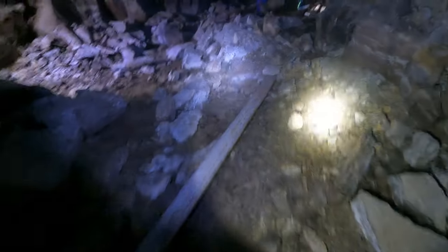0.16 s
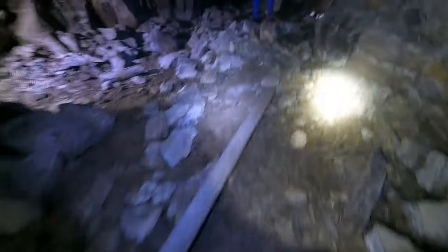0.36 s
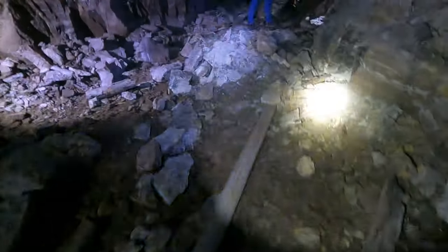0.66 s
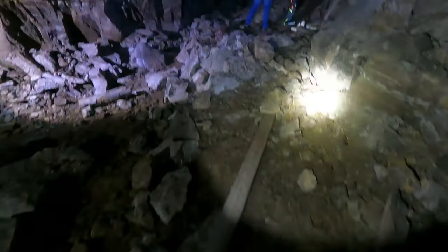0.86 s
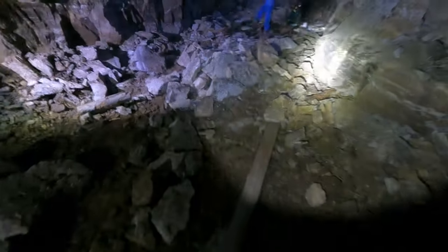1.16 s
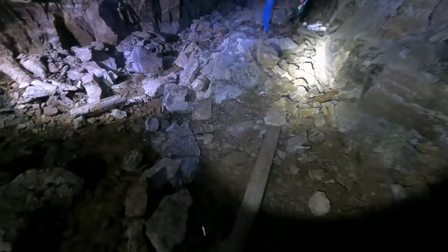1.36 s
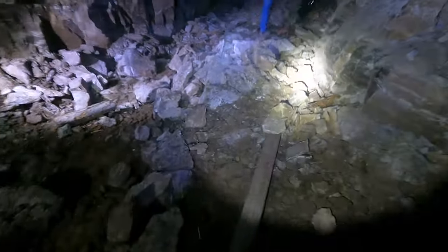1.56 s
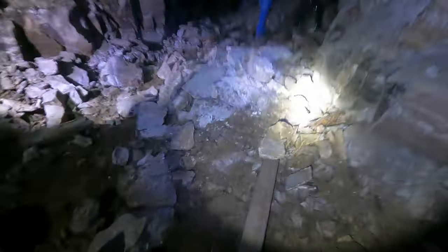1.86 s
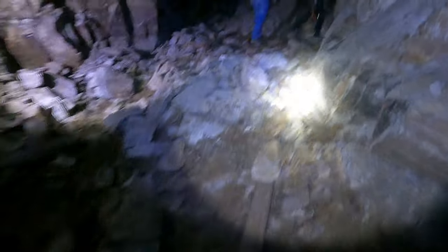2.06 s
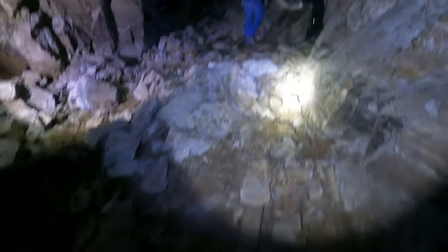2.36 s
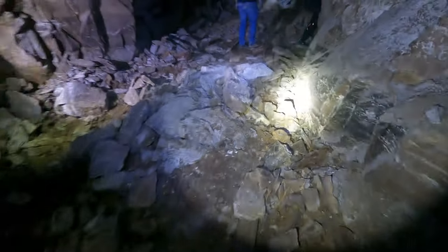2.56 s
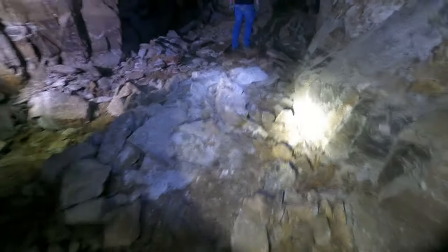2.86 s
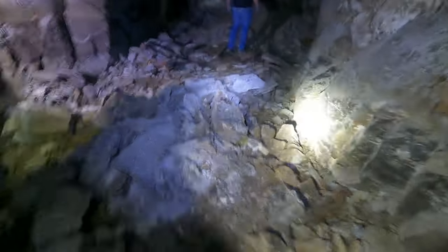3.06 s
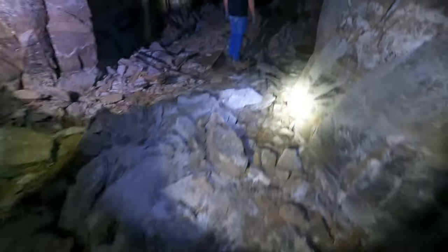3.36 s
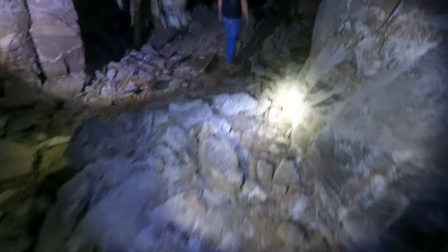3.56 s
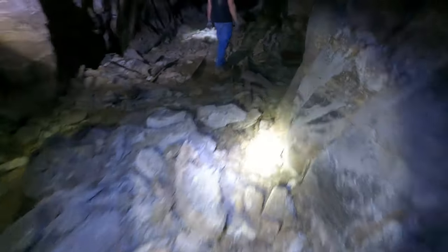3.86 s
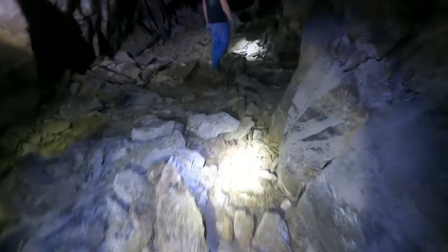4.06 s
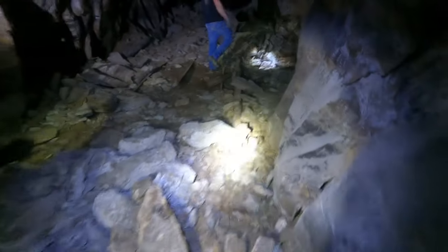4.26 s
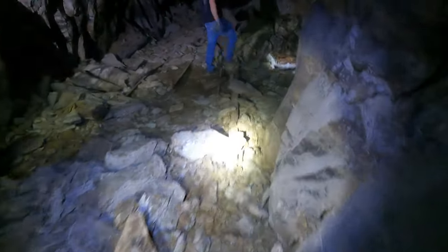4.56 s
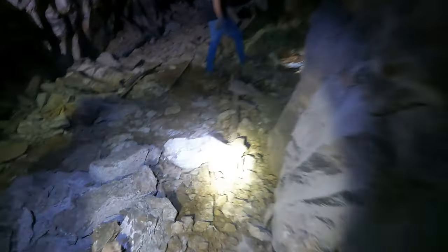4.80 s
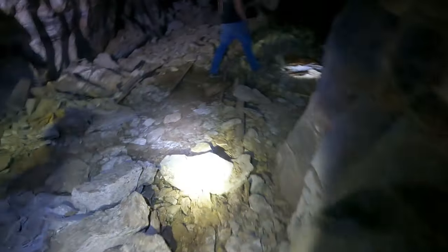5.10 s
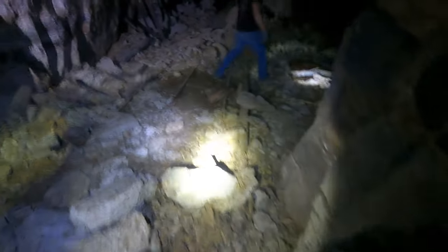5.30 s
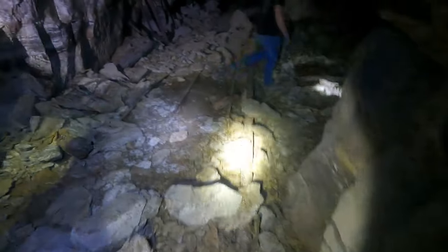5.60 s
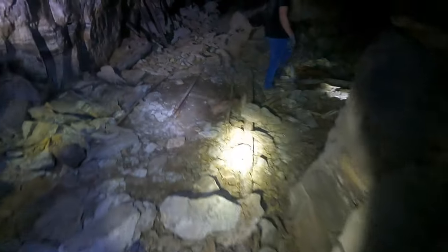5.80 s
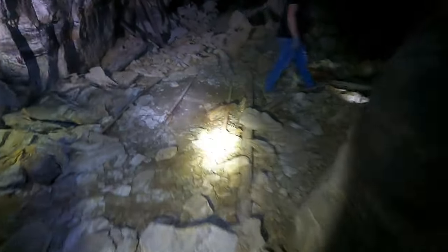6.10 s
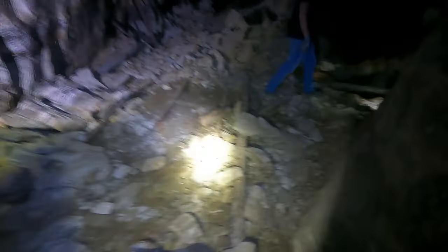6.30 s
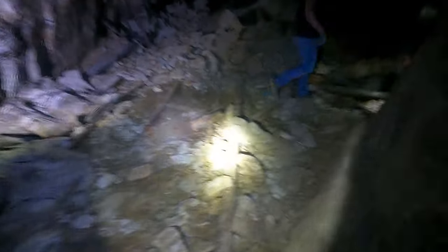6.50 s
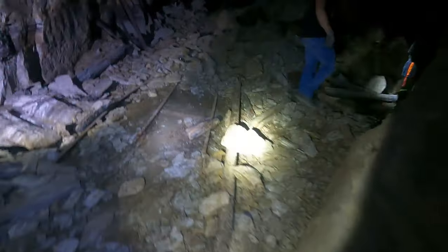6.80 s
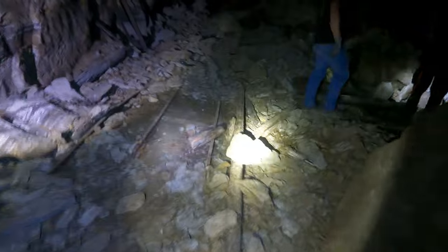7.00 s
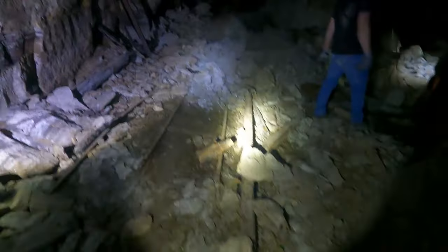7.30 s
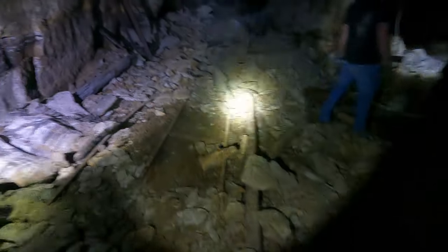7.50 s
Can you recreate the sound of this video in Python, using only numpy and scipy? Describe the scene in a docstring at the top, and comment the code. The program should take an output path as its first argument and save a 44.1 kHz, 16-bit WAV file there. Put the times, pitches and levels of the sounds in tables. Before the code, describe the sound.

Close, uneven footsteps crunch across broken stone in a mine passage, with dull thuds, sharp rock knocks and scuffed gravel over faint hiss.

```python
"""Boots on tunnel rubble

Boots tread over loose rock in a rough underground tunnel. Heels thud and stones clack and grind: noisy
contact forces drive damped modes. Slabs, gravel and grit crunch as showers of small ringing slips.
Each step also jolts the carried microphone, as low rumble. The tunnel answers with a short dull tail
of decaying noise, over a steady filtered hiss with two resonances."""
import sys
import numpy as np
from scipy import signal
from scipy.fft import rfft, irfft, next_fast_len
from scipy.io import wavfile

SR = 44100
rng = np.random.default_rng(int(sys.argv[2]) if len(sys.argv) > 2 else 0)


def convert_level_to_amplitude(level_db):
    """Map a level in decibels to its linear amplitude factor."""
    exponent = np.asarray(level_db, float) / 20
    return 10 ** exponent


def master_out(mix):
    """Clip the mix to full scale and print it as 16-bit PCM to the path in sys.argv[1]."""
    frames = np.transpose(np.atleast_2d(mix))
    ceiling = np.clip(frames, -1, 1)
    pcm = np.round(ceiling * 32767).astype(np.int16)
    wavfile.write(sys.argv[1], SR, pcm)


N = 337320
OPPOSITE = np.array([[1], [-1]])   # left and right in opposite sense


def rms_one(x):
    """Normalisation to unit root-mean-square."""
    return x / np.sqrt(np.mean(x ** 2) + 1e-20)


def at_hz(points, hz):
    """Interpolation of a curve along logarithmic frequency."""
    points = np.array(points)
    return np.interp(np.log(hz), np.log(points[:, 0]), points[:, 1])


def grid():
    """Zero padding: size and frequencies of a transform at least a second longer than the scene."""
    size = next_fast_len(N + SR)
    return size, np.maximum(np.arange(size // 2 + 1) * SR / size, 1)


def colour(x, spectrum_db):
    """Linear filtering: multiplication by a smooth response in the frequency domain."""
    size, hz = grid()
    return irfft(rfft(x, size) * convert_level_to_amplitude(spectrum_db(hz)), size)[..., :N]


def drift(rate_hz):
    """Low-passed random fluctuation of unit rms, from two equal real poles."""
    # computed at every 40th sample, with a run-in of 2000 values
    pole = np.exp(-80 * np.pi * rate_hz / SR)
    noise = rng.standard_normal(N // 40 + 2002)
    slow = signal.lfilter([1], [1, -2 * pole, pole * pole], noise)[2000:]
    return np.interp(np.arange(N) / 40, np.arange(len(slow)), rms_one(slow))


def ring(clicks, hz, t60):
    """Damped resonance: a unit click excites a decaying sine of initial height 1."""
    radius, angle = convert_level_to_amplitude(-60 / (t60 * SR)), 2 * np.pi * hz / SR
    poles = [1, -2 * radius * np.cos(angle), radius * radius]
    return signal.lfilter([0, np.sin(angle)], poles, clicks + 1e-18)


def contact(t60, rise_s):
    """Contact force: quadratic growth as the weight comes on, then exponential decay, within 0.25 s."""
    t = np.arange(SR // 4) / SR
    build_up = np.minimum(t / max(rise_s, 1e-4), 1) ** 2
    return build_up * convert_level_to_amplitude(-60 * np.maximum(t - rise_s, 0) / max(t60, .003))


def add(out, s, sound):
    """Superposition: a sound joins the sum at its onset time."""
    i = round(s * SR)
    out[..., i:i + sound.shape[-1]] += sound[..., :N - i]


# relative spectral density of the hiss: (frequency [Hz], level [dB per Hz])
HISS_SPECTRUM = [(59, -45), (100, -6.5), (359, 9), (653, -14), (726, -38), (861, -9), (1260, 0.5),
                 (1380, 0.5), (1740, 2.5), (2020, -3.5), (2670, -7.5), (7260, -10.5), (8790, -21.5),
                 (13800, -29.5), (16300, -46)]
# likeness of left and right hiss: (frequency [Hz], correlation [0 to 1])
HISS_CORRELATION = [(60, 0.58), (180, 0.52), (550, 0.34), (1650, 0.14), (4970, 0.86), (15000, 0.078)]


def hiss():
    """Partial coherence: shared and opposed noise mix so that likeness varies with frequency."""
    size, hz = grid()
    alike = at_hz(HISS_CORRELATION, hz)
    mid, side = rfft(rng.standard_normal((2, size))) * convert_level_to_amplitude(at_hz(HISS_SPECTRUM, hz))
    pair = np.sqrt(1 + alike) * mid + np.sqrt(1 - alike) * side * OPPOSITE
    level_db = -39.5 + 1.0 * drift(0.88)
    return convert_level_to_amplitude(level_db) * rms_one(irfft(pair, size)[:, :N])


# rubble stirring between the steps:
# (time [s], jolt rumble level [dB], shifting stones reference level [dB], scuffed grit level [dB])
STIRRING = [(0, -54, -45, -48), (1.0, -62, -45, -48), (1.6, -60, -53.5, -44.5), (2.0, -54, -39, -44.5),
            (3.0, -44, -45.5, -34.5), (3.7, -53, -46.5, -45), (4.2, -42.5, -36, -39),
            (5.0, -60, -41.5, -42), (5.7, -49, -41.5, -45), (6.3, -42, -34.5, -37.5), (6.88, -52, -50, -46),
            (7.12, -39, -35, -38.5), (7.65, -33, -37.5, -37.5)]
# weight comes onto the rubble: (time of full load [s], jolt rumble level [dB],
# shifting stones reference level [dB], scuffed grit level [dB],
# time to settle by 20 dB [s]; entries below 0.02 act as 0.02)
FOOTFALLS = [(0.02, -33, -40.5, -45, 0.16), (0.39, -48, -34.5, -43, 0.2), (0.448, -26, -27, -31.5, 0.18),
             (0.68, -30, -30, -36.5, 0.23), (0.78, -31, -32.5, -50, 0.04),
             (0.942, -27.5, -27.5, -22.5, 0.13), (1.33, -28, -30, -48, 0), (1.43, -50, -36.5, -37.5, .12),
             (1.75, -33.5, -34, -36, 0.5), (1.848, -27.5, -27.5, -38, 0.21), (2.22, -30, -34, -42, 0.2),
             (2.3, -30.5, -36, -35, 0.45), (2.4, -45, -40, -31.5, .15), (2.528, -29, -20, -27, -0.39),
             (2.13, -37, -33, -38, 0.25), (2.73, -38.5, -35, -51, 1.4), (2.93, -22.5, -28, -30.5, 0.07),
             (3.0, -30, -27, -29, -0.03), (3.07, -30, -30, -21, -0.06), (3.281, -24, -25.5, -45, 0.24),
             (3.42, -30, -37, -51, -0.23), (3.52, -27, -29, -46.5, -0.15), (3.62, -37.5, -48, -40, 0.2),
             (3.77, -38, -28.5, -36, 0.37), (3.85, -32, -32.5, -36.5, 0.46), (4.03, -28, -25, -40, 0.09),
             (4.45, -52.5, -42, -43.5, 0), (4.69, -19, -40.5, -36, 0.28), (4.81, -32.5, -27, -39, 0.56),
             (5.07, -35, -30.5, -38.5, 0.5), (5.32, -33.5, -41.5, -38, 0.9), (5.6, -29, -64, -39.5, -0.7),
             (5.8, -28, -31.5, -34, 0.2), (6.0, -29, -35, -38, -0.6), (6.1, -22, -26.5, -38, 0.18),
             (6.17, -26, -42, -33, 0.15), (6.28, -19.5, -33, -34, 0.36), (6.34, -37, -50, -49, 0.6),
             (6.439, -20, -22, -35.5, 0.13), (6.618, -23, -30, -31, 0.12), (6.729, -20.5, -30, -45, -0.08),
             (6.95, -26.5, -29, -33, .12), (7.27, -17.5, -27, -29, .12), (7.36, -26, -40, -53, 0.5),
             (7.449, -13.5, -22, -26, 0.1), (7.56, -22.5, -44, -45, -0.2)]


def tread():
    """Addition of powers: each step swells and settles above the stirring; jolt, stone and grit levels."""
    loading_s = 0.046   # the load swells by 20 dB in this time
    t = np.arange(0, N + 40, 40) / SR
    stir_s, *stir_levels = np.transpose(STIRRING)
    power = np.array([convert_level_to_amplitude(2 * np.interp(t, stir_s, db)) for db in stir_levels])
    for s, *levels_db, settle_s in FOOTFALLS:
        shape_db = -20 * np.maximum((s - t) / loading_s, (t - s) / max(settle_s, .02))
        power += convert_level_to_amplitude(2 * (np.c_[levels_db] + shape_db))
    return [np.interp(np.arange(N) / SR, t, 10 * np.log10(p)) for p in power]


# relative spectral density of the housing rumble: (frequency [Hz], level [dB per Hz])
JOLT_SPECTRUM = [(12, -40), (20, -5), (64, 6.5), (120, -1), (160, -5), (260, -120)]


def jolts(level_db):
    """Structure-borne excitation: steps shake the microphone housing, nearly alike on both sides."""
    mid, side = colour(rng.standard_normal((2, N)), lambda hz: at_hz(JOLT_SPECTRUM, hz))
    rumble = mid + convert_level_to_amplitude(-25) * side * OPPOSITE
    return convert_level_to_amplitude(level_db + 0.5 * drift(17)) * rms_one(rumble)


# weighting of the fragments by pitch, before a factor of frequency: (frequency [Hz], level [dB per Hz])
RUBBLE_SPECTRUM = [(71, -31), (120, 1), (378, -2.5), (445, -8.5), (643, -8), (911, 0), (988, -2),
                   (1320, -5.5), (7660, -21), (9020, -23.5), (12800, -25), (16000, -53)]


def crunch(level_db, low_hz, high_hz, median_per_s, cycles, spread_db, clump_db):
    """Clustered random impulses: fragments slip in clumps, each ringing briefly from its own side."""
    sizes = convert_level_to_amplitude(spread_db * np.minimum(rng.exponential(1, N), 5)) * rng.choice([-1, 1], N)
    born = rng.random(N) < median_per_s * convert_level_to_amplitude(clump_db * drift(25)) / SR
    side = convert_level_to_amplitude(rng.normal(0, 4.73, N))
    clicks = sizes * born * np.array([side, 1 / side])
    dealt = rng.integers(0, 16, N)   # which of 16 pitches a fragment has
    rings = 0
    for k, hz in enumerate(np.geomspace(low_hz, high_hz, 16)):
        weight = convert_level_to_amplitude(at_hz(RUBBLE_SPECTRUM, hz)) * hz
        rings = rings + weight * ring(clicks * (dealt == k), hz, t60=cycles / hz)
    return convert_level_to_amplitude(level_db) * rms_one(rings)


def slabs(stones_db):
    """Low resonance of sparse slips: large stones shift, averaged to the centre."""
    return crunch(stones_db + 3, 133.0, 563, median_per_s=400, cycles=4.86,
                  spread_db=3.0, clump_db=3.5).mean(axis=0)


def gravel(stones_db):
    """Middle resonance of denser, strongly clustered slips."""
    return crunch(stones_db - 2.5, 904, 2340, median_per_s=2500, cycles=4.1,
                  spread_db=3.0, clump_db=6.0)


def grit(grit_db):
    """High resonance of dense, nearly equal slips: scuffing under the soles."""
    return crunch(grit_db, 2610, 13600, median_per_s=9000, cycles=6.9,
                  spread_db=1.0, clump_db=3.5)


# softer, hollow steps: (time [s], peak level [dB], pitch [Hz], force T60 [s], force rise [s])
HOLLOW_STEPS = [(0.067, -15.5, 283, 0.12, 0.022), (0.238, -16, 245, 0.12, 0.017),
                (1.09, -31, 347, 0.86, 0.046), (5.035, -20.5, 300, 0.22, 0.0094),
                (7.03, -25, 353, 0.087, 0.024)]


def hollows():
    """Cascaded resonance: a soft landing feeds one dark mode twice over, so it hums rather than knocks."""
    out = np.zeros(N)
    for s, db, hz, t60, rise_s in HOLLOW_STEPS:
        force = contact(t60, rise_s)
        once = ring(rng.standard_normal(len(force)) * force, hz, 6.1 / hz)
        sound = ring(once, hz, 6.1 / hz)
        add(out, s, convert_level_to_amplitude(db) * sound / np.abs(sound).max())
    return out


# nominal modes of a struck stone: (pitch ratio [1], level [dB], share of the ring time [1])
STONE_MODES = [(1.007, -2, 1.0), (1.132, -4, 0.6), (0.64, -9, 0.74), (1.58, -5.5, .6), (2.33, -8, 0.32)]


def blow(hz, force, cycles):
    """Modal excitation: a firm hit amid a rattle of uneven, rounded contacts rings damped modes; peak 1."""
    rattle = rng.standard_normal(len(force)) ** 3 * force
    peak = force.argmax()
    # the slower the landing, the weaker the firm hit
    rattle[peak] += 4.05 * np.sqrt(SR / hz) / (1 + (peak * hz / SR / 1.42) ** 2)
    rounded = signal.butter(2, min(2.68 * hz, SR / 3), fs=SR, output="sos")
    push = signal.sosfilt(rounded, rattle)
    out = 0
    for ratio, db, share in STONE_MODES:
        level_spread, pitch_spread = rng.normal(0, 1, 2)   # no two stones alike
        mode_hz = min(hz * ratio * (1 + 0.046 * pitch_spread), SR / 3)
        out = out + convert_level_to_amplitude(db + 2.4 * level_spread) * ring(push, mode_hz, t60=cycles * share / hz)
    return out / np.abs(out).max()


# heel and slab blows: (time [s], peak level [dB], pitch [Hz], rattle T60 [s], force rise [s])
HEEL_BLOWS = [(0.4255, -16, 159, 0.13, 0.0098), (0.6108, -11.5, 218, 0.093, 0.0039),
              (0.7593, -20, 211, 0.25, 0.0015), (0.9376, -4, 236, 0.21, 0.0039),
              (1.3497, -21.5, 270, 0.12, 0.0061), (1.679, -11, 180, 0.087, 0.0028),
              (1.797, -8, 253, 0.058, 0.0063), (1.8258, 0, 250, 0.017, 0.0037),
              (2.105, -15, 273, 0.24, 0.034), (2.2678, -11, 270, 0.14, 0.0067),
              (2.4914, -11.5, 310, 0.25, 0.011), (2.7362, -21, 141, 0.074, 0.014),
              (2.966, -14.5, 126, 0.11, 0.00031), (3.0245, -22, 430, 0.17, 0.023),
              (3.2682, -1.3, 258, 0.042, .011), (3.5112, -20.5, 257, 0.12, 0.0057),
              (3.732, -21, 337, 0.077, 0.0064), (3.7661, -15, 306, 0.043, .0095),
              (3.83, -13, 170, 0.055, .0081), (4.0069, -6, 360, .071, 0.0076),
              (4.06, -10, 169, 0.055, 0.003), (4.4214, -18, 315, 0.048, 0.0069),
              (4.5277, -14.5, 193, 0.075, .0042), (4.6694, -5.5, 183, 0.044, 0.0041),
              (4.7587, 0.5, 182, 0.024, 0.003), (4.8114, -8, 210, 0.12, 0.0019),
              (4.85, -12, 193, 0.039, 0.012), (5.0636, -15.5, 190, 0.078, .0075),
              (5.7707, -6.5, 302, 0.091, 0.0043), (5.8229, -2.5, 271, .021, .0038),
              (5.9701, -23, 408, .053, 0.0097), (6.092, -7, 156, 0.052, 0.0041),
              (6.1385, -11.5, 260, 0.045, 0.0017), (6.2577, -1.5, 218, 0.033, 0.0039),
              (6.4237, -5, 123, 0.069, 0.0035), (6.6083, -24, 139, 0.079, 0.0061),
              (6.6704, -4, 156, 0.18, 0.0034), (6.933, -13, 126, .129, 0.0054),
              (7.138, -18, 251, 0.031, 0.0031), (7.178, -11, 252, 0.02, .0021),
              (7.2699, -5.5, 259, 0.045, 0.0024), (7.3227, -10, 122, .24, 0.0045),
              (7.4379, -9.5, 316, 0.11, 0.013), (7.456, -6.5, 106, 0.1, 0.0036),
              (7.501, -10.5, 139, 0.077, 0.00096), (7.63, -15, 240, 0.043, 0.0075)]


def thuds():
    """Low-frequency modal response: heavy blows whose slab rocks for a moment after contact."""
    out = np.zeros(N)
    for s, db, hz, t60, rise_s in HEEL_BLOWS:
        add(out, s, convert_level_to_amplitude(db) * blow(hz, contact(t60, rise_s), cycles=10.7))
    return out


def stone_on_stone(rows, rise_s, cycles):
    """Impact plus fracture noise: a dry knock and a crack of grit in uneven bursts, off to either side."""
    out = np.zeros((2, N))
    bright = signal.butter(2, [1500, 7500], "band", fs=SR, output="sos")
    for s, db, hz, crack_db, t60 in rows:
        force = contact(t60, rise_s)
        bursts = rng.gamma(2.0, 1, len(force) // 32 + 1).repeat(32)[:len(force)]
        crack = signal.sosfilt(bright, rng.laplace(size=len(force)) * bursts * force)
        sound = blow(hz, force, cycles) + convert_level_to_amplitude(crack_db) * crack / np.abs(crack).max()
        sides_db = 0.5 * OPPOSITE * rng.normal(0, 3.0)
        add(out, s, convert_level_to_amplitude(db + sides_db) * sound)
    return out


# stone is ground against stone under the sole: (time [s], peak level of the knock [dB], pitch [Hz],
# bright crack re knock peak [dB], rattle T60 [s])
GROUND_STONES = [(0.427, -14, 1555, -20, 0.32), (0.58, -24, 730, -7, 0.22), (0.602, -7, 1030, -19, 0.22),
                 (0.625, -12, 2260, -11, 0.21), (0.7491, -21, 1540, -4, 0.11),
                 (0.922, -11, 600, -0.5, 0.18), (1.3297, -22.5, 990, -9.5, 0.23),
                 (1.3936, -29, 1040, 3, 0.077), (1.6793, -20.5, 1240, 0.5, 0.4),
                 (1.7879, -17, 1120, 5, 0.35), (2.487, -14.5, 840, 0, 0.25), (3.005, -15, 1270, 0.5, 0.23),
                 (3.028, -9.5, 890, -2, 0.26), (3.103, -15.5, 1220, -1.5, 0.12),
                 (3.4959, -22, 1180, -1, 0.17), (3.75, -12.5, 1920, -7, 0.14), (3.964, -21, 1940, 3, 0.26),
                 (4.4088, -18, 1055, -4, .1), (5.057, -17, 1310, -3, 0.12), (5.1358, -20.5, 990, 4, 0.071),
                 (5.2114, -19, 1350, 3.5, .51), (5.8256, -27, 705, -14, 0.079),
                 (6.406, -12.5, 1660, 1, 0.083), (6.561, -17, 1300, 2, 0.1), (6.9667, -19, 1150, -2, 0.2),
                 (7.2063, -15, 3280, 1, 0.17), (7.423, -7.5, 2200, 0.5, 0.092)]


def grinds():
    """Gradual loading: a slow rise of force weakens the firm hit and favours the rattle."""
    return stone_on_stone(GROUND_STONES, rise_s=.016, cycles=15.5)


# stone strikes stone sharply: (time [s], peak level of the knock [dB], pitch [Hz],
# bright crack re knock peak [dB], rattle T60 [s])
STRUCK_STONES = [(0.4839, -18.5, 1040, -5, 0.15), (0.6359, -10, 960, -7, 0.066),
                 (0.6586, -12, 1950, -21, 0.051), (0.9681, -15, 2770, 6, .08),
                 (1.8244, -15, 1260, -2, 0.13), (1.8708, -31, 1180, -7, 0.24),
                 (1.9395, -12.5, 1270, -12.5, .1), (2.2539, -23, 1460, 5, 0.33),
                 (2.2915, -15.5, 2100, -20, 0.075), (2.701, -23, 7000, -5, .012),
                 (2.9191, -16, 1614, -21, 0.052), (2.9505, -4.5, 2160, -19, 0.011),
                 (3.2629, -12, 890, -1, 0.094), (3.2758, -16, 1080, 4.5, 0.039),
                 (3.3591, -19.5, 958, -19, .013), (3.445, -24, 1173, -23.5, .069),
                 (3.811, -10, 1550, 3.5, 0.11), (3.8585, -15.5, 1190, -1.5, 0.042),
                 (4.0063, -4, 900, -27, 0.16), (4.442, -14, 1730, -27, 0.028),
                 (4.4876, -13.5, 2340, -16.5, 0.2), (4.5242, -12, 1911, -10, 0.11),
                 (4.6687, -13.5, 1050, -6, 0.026), (4.7565, -9.5, 855, -1.5, 0.027),
                 (4.7725, -13, 760, 11, 0.016), (4.8151, -.5, 3200, -3, .051),
                 (4.9597, -10, 1850, -10.5, 0.013), (5.171, -25, 1038, -8, 0.018),
                 (5.772, -16.5, 1310, 2, 0.14), (6.1121, -16.5, 974, -1, 0.048),
                 (6.1325, -7, 1140, 1, 0.02), (6.1483, -14.5, 940, 1, 0.02), (6.2134, -16, 1760, 0.5, 0.05),
                 (6.256, -11, 1108, -17, 0.019), (6.2752, -11, 1150, -12, 0.009),
                 (6.287, -11, 890, -14, 0.072), (6.3062, -14, 970, -7, .04),
                 (6.3353, -17.5, 980, -18, 0.028), (6.442, -11.5, 1610, -22, .045),
                 (6.671, 0, 1024, -9.5, 0.039), (6.873, -28, 6500, -10, .012),
                 (6.9346, -8.5, 2770, -23, 0.051), (6.9537, -17, 1840, -2.5, 0.021),
                 (7.028, -18, 6000, -6, .012), (7.1761, -15.5, 2350, -2.5, 0.053),
                 (7.272, -12, 1060, -0.5, 0.056), (7.2875, -16.5, 1310, 0, 0.034),
                 (7.3201, -7.5, 1850, -9, 0.026), (7.4152, -10, 1710, -10, 0.045),
                 (7.5396, -2, 7060, -33, 0.016)]


def clacks():
    """Impulsive loading: a fast rise of force makes small hard stones knock sharply."""
    return stone_on_stone(STRUCK_STONES, rise_s=0.00127, cycles=11.6)


# thin slivers that ring on: (time [s], peak level [dB], pitch [Hz], T60 of the touches [s])
SLIVERS = [(4.335, -30, 1940, 0.4), (5.68, -46, 1320, 0.35), (7.033, -29.5, 3030, 0.13),
           (7.322, -21, 5150, 0.054), (7.326, -26, 2030, 0.22)]


def clinks():
    """Random forcing of one mode: a sliver shivers and wavers, fed by repeated touches."""
    out = np.zeros(N)
    for s, db, hz, t60 in SLIVERS:
        force = contact(t60, rise_s=0.0017)
        sound = ring(rng.standard_normal(len(force)) * force, hz, 0.2 * t60)
        add(out, s, convert_level_to_amplitude(db) * sound / np.abs(sound).max())
    return out


# reverberation time of the tunnel: (frequency [Hz], T60 [s])
REVERBERATION = [(100, 0.18), (500, 0.2), (3000, 0.081), (12000, 0.24)]


def tunnel(x, apart_hz=900):
    """Diffuse reverberation: rough walls scatter a tail, shared in the bass, separate per side above."""
    size, hz = grid()
    t, tail = np.arange(SR // 2) / SR, 0
    for centre in 63 * 2 ** np.arange(8):   # octave bands
        edges = [centre / 2 ** .5, centre * 2 ** .5]
        band = signal.butter(2, edges, "band", fs=SR, output="sos")
        noise = signal.sosfilt(band, rng.standard_normal((2, len(t))))
        tail = tail + noise * convert_level_to_amplitude(-60 * t / at_hz(REVERBERATION, centre))
    delayed = tail * (t > .004)
    mid, side = rfft(delayed / np.sqrt(np.sum(tail[0] ** 2)), size)
    apart = hz / np.hypot(hz, apart_hz)
    response = mid + apart * side * OPPOSITE
    return irfft(rfft(x.mean(axis=0), size) * response, size)[:, :N]


# response of the microphone capsule to airborne sound: (frequency [Hz], gain [dB])
AIRBORNE_RESPONSE = [(60, -48), (140, -1), (300, 1.5), (650, -0.5), (1500, -1), (7400, -3.5), (8800, -12.5),
                     (13500, -15.5), (16200, -20)]


def capsule(air):
    """Frequency response: the capsule filters the airborne sound, weak in deep bass and treble."""
    return colour(air, lambda hz: at_hz(AIRBORNE_RESPONSE, hz))


def scene():
    """Superposition of paths: feet and echo through the air, jolts through the housing, hiss behind."""
    jolt_db, stones_db, grit_db = tread()
    rubble = slabs(stones_db) + gravel(stones_db) + grit(grit_db)
    feet = hollows() + thuds() + grinds() + clacks() + clinks() + rubble
    heard = capsule(feet + convert_level_to_amplitude(-9.0) * tunnel(feet))
    return hiss() + jolts(jolt_db) + heard


# imbalance of the two microphone ports: (frequency [Hz], left over right [dB])
PORT_BALANCE = [(60, 0.5), (110, 0.5), (200, 1.0), (380, 2.0), (700, 3.0), (1290, 4.0), (2380, 4.5),
                (4400, 3.0), (8120, 3.0), (15000, 10.0)]


def ports(dry):
    """Interchannel level difference: the left port is more open in the treble."""
    return colour(dry, lambda hz: at_hz(PORT_BALANCE, hz) * 0.5 * OPPOSITE)


def top_cut(x):
    """Nothing passes above the cut-off."""
    return signal.sosfilt(signal.butter(12, 16470, fs=SR, output="sos"), x)


def record(dry):
    """Saturation: past the unequal ports, a hyperbolic tangent rounds the peaks."""
    mix = 1.447 * np.tanh(ports(dry) / 1.232)
    return top_cut(mix)


dry = scene()
out = record(dry)
master_out(out)
```